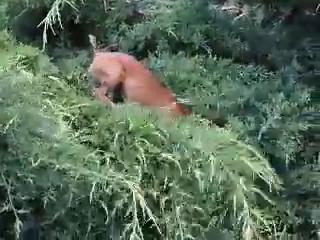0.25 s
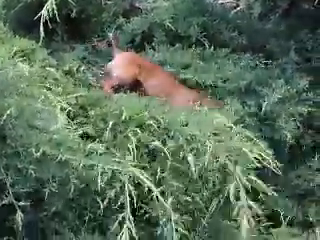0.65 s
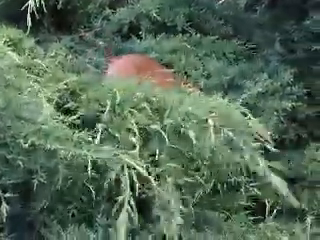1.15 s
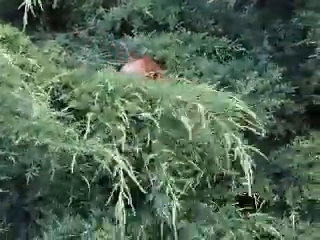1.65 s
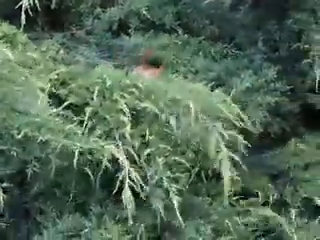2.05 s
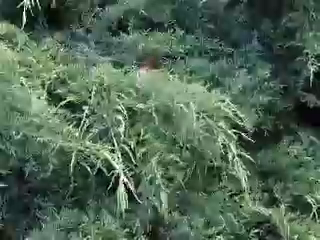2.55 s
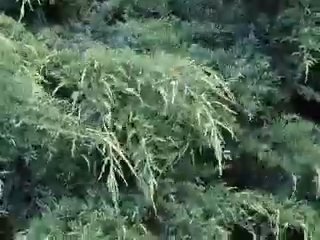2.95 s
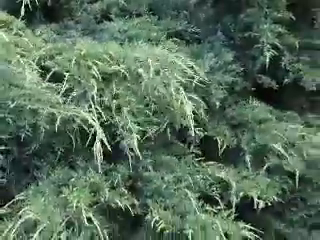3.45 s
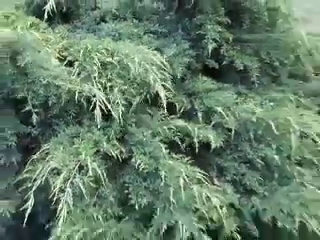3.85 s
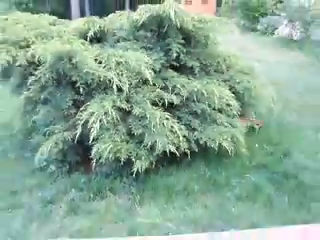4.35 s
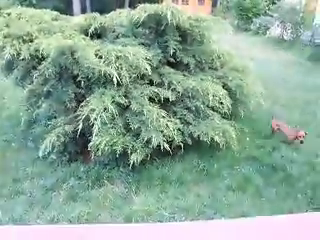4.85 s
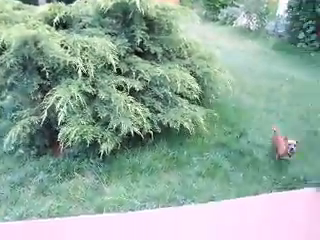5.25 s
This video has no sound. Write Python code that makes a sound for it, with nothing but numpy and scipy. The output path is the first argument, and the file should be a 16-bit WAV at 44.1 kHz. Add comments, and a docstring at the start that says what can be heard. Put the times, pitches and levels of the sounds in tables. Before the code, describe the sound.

Soft dry needle swishes and faint motor rattles open under bright bird phrases and one far, high yap. After a quieter middle, the bush shakes harder with loud snaps, while a volley of far deep barks echoes outdoors. A dull plastic knock follows, then light scuffing at the lawn edge. Mono, slightly dull camera microphone with low hiss and hum.

```python
"""Over a low hum, hiss and fading far rumble, a small dog pushes through a dense juniper: grains of noise swish.
Hoarse far birds warble, a near thrush sings (gliding sines) and a small dog yaps far off (pulses and breath).
A camera's lens motor buzzes and rattles, far birds whistle, twigs snap (noise bursts); then a big dog barks far off.
Late on, knocks ring the camera's case (damped modes) and paws scuff the lawn edge (gritty noise).
The garden echoes birds, dogs and twigs (noise tails)."""
import sys
import numpy as np
from scipy import signal
from scipy.io import wavfile
from scipy.ndimage import uniform_filter1d

SR = 44100
rng = np.random.default_rng(int(sys.argv[2]) if len(sys.argv) > 2 else 0)


def put_to_file(sound):
    """Save the sound as 16-bit audio at rate SR, in the file named by the first command-line argument."""
    columns = np.atleast_2d(sound).T  # one column per channel
    safe = np.clip(columns, -1, 1)
    whole_steps = np.round(safe * 32767)
    wavfile.write(sys.argv[1], SR, whole_steps.astype(np.int16))


N = 242986
TIME = np.arange(N) / SR   # s


def amp(db):
    """Amplitude ratio of a level in dB."""
    return np.exp(np.asarray(db) * np.log(10) / 20)


def unit(x):
    """Scale to rms 1."""
    return x / np.sqrt(np.mean(x ** 2) + 1e-20)


def columns(rows, start_s=0, fade_s=0.0023):
    """Columns over time, and a gate that is open only inside the table."""
    s, *values = np.transpose(rows)
    s = s + start_s
    gate = np.clip(np.minimum(TIME - s[0], s[-1] - TIME) / fade_s, 0, 1)
    return [np.interp(TIME, s, v) for v in values] + [gate]


def drift(rate_hz):
    """Random wander of spread 1: straight lines between random knots."""
    knots = rng.standard_normal(int(rate_hz * N / SR) + 2)
    return np.interp(TIME * rate_hz, np.arange(len(knots)), knots) * 1.22


def resonate(x, hz, width_hz):
    """Two-pole resonance with gain 1 on top."""
    r = np.exp(-np.pi * width_hz / SR)
    poles = [1, -2 * r * np.cos(2 * np.pi * hz / SR), r * r]
    return signal.lfilter(np.array([1, 0, -1]) * (1 - r * r) / 2, poles, x)


def colour(sources, spectrum, patchiness):
    """Third-octave bands of two sources dealt in turn, each band flickering; rms 1."""
    out, together, points = 0, drift(10), np.array(spectrum)
    edges_hz = 18 * 2 ** np.arange(0, 9.1, 1 / 3)
    for k, (low, high) in enumerate(zip(edges_hz, edges_hz[1:])):
        centre = np.log(low * high) / 2
        level_db = np.interp(centre, np.log(points[:, 0]), points[:, 1], left=-90)
        if level_db > -80:
            bandpass = signal.butter(2, [low, high], "band", fs=SR, output="sos")
            band = signal.sosfilt(bandpass, sources[k % 2])
            flicker_db = patchiness * (0.28 * together + drift(20))
            out = out + band * amp(level_db + flicker_db)
    return unit(out)


def grains(per_s, spread_db):
    """Two trains of tiny random contacts of uneven size, sharing their moments."""
    hits = rng.random(N) < per_s / SR
    sizes = amp(spread_db * np.minimum(rng.exponential(1, N), 5)) * hits
    envelope = uniform_filter1d(sizes, size=12) + 0.17 * np.mean(sizes)
    return envelope * rng.standard_normal((2, N))


def swells(rows):
    """Humps of gain that rise to a peak and fall at constant dB/s, added in power."""
    power = 0
    for peak_s, db, up_s, down_s in rows:   # up_s, down_s: time per 10 dB
        rise = (peak_s - TIME) / max(up_s, .005)
        fall = (TIME - peak_s) / max(down_s, .005)
        power = power + amp(db - 10 * np.maximum(rise, fall)) ** 2
    return np.sqrt(power)


def burst(s, t60_s, noise, rise_s):
    """Noise that swells from s and dies away."""
    after = np.clip(TIME - s, 0, 1)
    return noise * np.clip(after / rise_s, 0, 1) * amp(-60 * after / max(t60_s, .005))


def whistle(rows, start_s=0, gain_db=0, waver=.004, flutter_db=7.0, pace_hz=55):
    """A near sine that wavers in pitch (share) and level."""
    hz, level_db, gate = columns(rows, start_s, fade_s=0.0012)
    phase = 2 * np.pi * np.cumsum(hz * (1 + waver * drift(pace_hz))) / SR
    level_db = level_db + gain_db + flutter_db * drift(pace_hz)
    return np.sqrt(2) * gate * amp(level_db) * np.sin(phase)


def strokes(rows, **voice):
    """Each stroke glides evenly in pitch, swells over its first 3 % and holds."""
    share, shape_db = np.array([0, .03, 1]), np.array([-30, 0, 0])
    return sum(whistle(np.c_[s + share * length, first + share * (last - first), db + shape_db], **voice)
               for s, length, first, last, db in rows)


def bark(rows, throat, jitter, roughness, flutter, start_s=0, top_hz=1, gain_db=0):
    """Jittered pulses and gated breath through throat resonances; an open mouth lifts the upper ones."""
    pitch, level_db, mouth, gate = columns(rows, start_s)
    cycle = np.cumsum(top_hz * pitch * (1 + jitter * drift(150))) / SR % 1
    pulses = unit(np.exp(-9 * cycle) - 1 / 9)
    breath = rng.standard_normal(N) * (cycle < .5)
    breath_share = roughness * np.clip(.5 + .6 * mouth, 0, .85)   # a closing mouth sounds clearer
    source = (1 - breath_share) * pulses + breath_share * breath
    (low_hz, low_width_hz, _), *upper = throat
    low = resonate(resonate(source, low_hz, low_width_hz), low_hz, low_width_hz)
    high = sum(amp(db) * resonate(resonate(source, f, w), f, w) for f, w, db in upper)
    voice = low + 2 * np.clip(mouth, 0, 1) * high
    voice = voice / np.sqrt(uniform_filter1d(voice ** 2, size=2000) + 1e-9)   # even out before the envelope
    flutter_db = flutter * np.clip(2 * mouth, 0, 1) * np.clip(drift(130), -2, .5)
    return voice * gate * amp(level_db + gain_db + flutter_db)


def background():
    """Distant air and hiss, a far rumble dying at 16.5 dB/s, a wavering hum: coloured and resonated noise."""
    # distant air and hiss: f/Hz, density/dB per Hz (relative)
    air_spectrum = [(12, -29), (20, -0.5), (29, -8), (48, -3), (80, -20), (125, -14), (378, -16.5),
                    (577, -15), (1560, -18), (1820, -16), (2450, -15.5), (3560, -18), (7150, -20),
                    (7700, -10.5), (10000, -52), (16900, -120)]
    # hum: f/Hz, width/Hz, rms/dB
    hum_bands = [(53, 10, -61), (103, 8, -70)]
    air = amp(-45.5) * colour(rng.standard_normal((2, N)), air_spectrum, patchiness=1.77)
    rumble = amp(-55.5 - 16.5 * TIME) * unit(resonate(rng.standard_normal(N), 94, 12))
    hum = sum(amp(db) * unit(resonate(rng.standard_normal(N), hz, width)) for hz, width, db in hum_bands)
    return air + rumble + hum


def bush():
    """One train of small contacts shakes needles (fine, bright) and thicker branches (lower)."""
    # steady stirring: t/s, level/dB
    stirring = [(0, -58.5), (0.45, -43.5), (0.95, -45.5), (1.6, -44), (1.95, -50.5), (2.45, -75),
                (2.72, -52), (2.9, -51), (3.2, -46), (3.65, -41), (3.88, -52), (4.1, -36.5), (4.3, -39),
                (4.68, -39.5), (4.92, -51), (5.12, -41.5), (5.2, -64), (5.51, -42)]
    # shoves against a spray of needles: peak t/s, level/dB, swell/s per 10 dB, fade/s per 10 dB
    shoves = [(0.23, -45.5, 0.035, 0.069), (0.61, -34.5, 0.083, 0.065), (1.17, -41.5, 0.072, 0.05),
              (2.1, -42, 0.16, 0.36), (2.85, -40, 0.1, 0.064), (2.95, -41, 0.021, 0.037),
              (3.06, -33, 0.11, 0.24), (3.29, -28.5, 0.03, 0.062), (3.38, -30.5, 0.052, 0.034),
              (3.475, -33, 0.043, 0.09), (3.56, -37.5, 0.06, 0.095), (3.75, -33, 0.077, 0.077),
              (3.97, -36.5, .03, 0.23), (4.45, -38.5, 0.054, 1), (4.75, -29, 0.015, 0.079),
              (5.38, -41.5, 0.22, 0.026), (5.48, -34, 0.043, 0.013)]
    # needles, then branches: f/Hz, density/dB per Hz (relative)
    needle_spectrum = [(2500, -13), (3800, -36), (4800, -5), (6500, 1.5), (7800, -2), (9000, 5)]
    branch_spectrum = [(150, -13.5), (500, -8), (1000, -11.5), (1700, -6), (2600, -8.5), (4000, -11.5),
                       (6000, -18)]
    # branches in the mix: t/s, level/dB
    branch_share = [(0, -8), (3.5, -6), (4.1, -7), (5.51, -13.5)]
    stir_db, _ = columns(stirring)
    swish = np.hypot(amp(stir_db), swells(shoves))
    contacts = grains(5000, 1.6) * amp(1.4 * drift(45))
    needles = colour(contacts, needle_spectrum, patchiness=1.96)
    branches = colour(contacts, branch_spectrum, patchiness=1.5)
    branch_db, _ = columns(branch_share)
    return swish * (amp(-1.5) * needles + amp(branch_db) * branches)


def hoarse_warble():
    """Birds farther still: gliding sines, hoarse from fast pitch waver."""
    # strokes: t/s, length/s, first f/Hz, last f/Hz, level/dB
    warble = [(-.03, 0.16, 2240, 2210, -49), (.48, 0.2, 2595, 2593, -46.5),
              (1.41, 0.078, 3580, 3430, -48.5), (1.41, 0.059, 3150, 2985, -45),
              (1.47, 0.12, 2826, 2050, -47.5), (1.54, 0.063, 2086, 2000, -51.5),
              (1.82, 0.29, 1966, 2280, -55), (2.1, 0.11, 2286, 2384, -49), (2.24, .22, 2220, 2025, -53),
              (2.5, 0.1, 2090, 2215, -52), (2.62, 0.15, 2450, 2360, -53), (5.335, 0.057, 1783, 2020, -47.5)]
    return strokes(warble, waver=.022, flutter_db=3.5, pace_hz=140)


def thrush():
    """Three motifs of gliding sines, each sung from its template."""
    # motif strokes: t after start/s, length/s, first f/Hz, last f/Hz, relative level/dB
    zigzag = [(0, 0.023, 4630, 3500, -4.5), (.016, 0.019, 3560, 4300, -10), (.038, 0.02, 3400, 4100, -3.5),
              (.05, 0.0098, 4100, 5200, -7), (.057, 0.018, 3750, 2820, -1.5)]
    dip = [(0, 0.0142, 3700, 3270, -9.5), (.015, 0.0215, 3300, 3930, -12), (.048, .014, 2900, 3300, -15),
           (.06, 0.0153, 3270, 2880, -11)]
    flourish = [(.005, 0.022, 2960, 3360, -7), (.03, 0.016, 3620, 3320, -2.5),
                (.068, 0.0135, 3400, 3790, -5.5), (.086, 0.029, 3600, 4450, -6.5),
                (.105, 0.0189, 4170, 5210, 2), (.119, 0.01275, 5100, 5650, -7)]
    # when each motif is sung: t/s, level/dB
    zigzag_starts = [(0.046, -34.5), (0.199, -33), (.358, -34.5)]
    dip_starts = [(.526, -26), (0.688, -27.5), (.852, -27), (1.023, -27.5)]
    flourish_starts = [(1.191, -32)]
    songs = [(zigzag, zigzag_starts), (dip, dip_starts), (flourish, flourish_starts)]
    return sum(strokes(motif, start_s=s, gain_db=db, waver=0.008, flutter_db=1.5, pace_hz=200)
               for motif, starts in songs for s, db in starts)


def small_dog():
    """One high yap through a small throat."""
    # yap: t/s, pitch/Hz, level/dB, mouth opening/0-1
    yap = [(.18, 1070, -49, 0.2), (.234, 1062, -43, 0), (.241, 1027, -28.5, 0.24), (.26, 1019, -34, 0.2),
           (.31, 961, -33.5, 0.95), (.345, 926.4, -38, 0.6), (.385, 951, -38.5, 0.64),
           (.44, 912, -44.5, 0.47), (.52, 897, -60.5, 0.35)]
    # throat resonances: f/Hz, width/Hz, level/dB
    small_throat = [(1010, 340, 0), (810, 140, -6), (1350, 90, -3), (1900, 300, 0.5)]
    return bark(yap, small_throat, jitter=.03, roughness=0.8, flutter=6)


def lens():
    """Each motor step is a tonal buzz (an impulse into a resonance), then a gear rattle (a noise burst)."""
    # runs of steps: first t/s, last t/s, spacing/s, buzz level/dB, rattle level/dB
    runs = [(0.217, 0.416, .1, -47.5, -28), (0.551, 0.684, .033, -51.5, -39),
            (1.818, 1.848, .033, -49.5, -33.5), (1.878, 1.979, .1, -60, -33.5),
            (2.05, 2.215, .033, -50.5, -38.5), (2.278, 2.677, .1, -60, -30.5), (2.779, 2.878, .1, -58, -32),
            (4.353, 4.353, .1, -46, -32), (4.733, 4.733, .1, -45, -45), (4.889, 4.889, .1, -53, -41),
            (4.947, 5.047, .033, -50.5, -34.5), (5.28, 5.345, .066, -53, -32),
            (5.414, 5.452, .036, -51.5, -34)]
    buzz_hz, rattle_lag_s, step_spread_db = 615, 0.0105, 1.5
    noise, buzz, rattle = rng.standard_normal(N), np.zeros(N), np.zeros(N)
    for first, last, spacing, buzz_db, rattle_db in runs:
        for s in np.linspace(first, last, round((last - first) / spacing) + 1):
            buzz_off_db, rattle_off_db = step_spread_db * rng.standard_normal(2)
            buzz[round(s * SR)] = amp(buzz_db + buzz_off_db)
            step = burst(s + rattle_lag_s, 0.059, noise, rise_s=0.00087)
            rattle += amp(rattle_db + rattle_off_db) * step
    buzz = resonate(resonate(buzz, buzz_hz, 75), buzz_hz, 75) * amp(55.5)   # make up the filters' loss
    return buzz + 1.7 * resonate(rattle, 1920, 1020) + 0.53 * resonate(rattle, 3700, 4800)


def far_whistles():
    """Clear far birds: gliding sines with a slight waver."""
    # strokes: t/s, length/s, first f/Hz, last f/Hz, level/dB
    whistles = [(.47, 0.38, 1772, 1776, -47.5), (.68, 0.063, 2070, 2040, -54), (.74, 0.36, 1913, 1840, -52),
                (1.57, .15, 3960, 4020, -56), (2.68, 0.14, 1970, 1982, -57.5),
                (5.25, 0.33, 2764, 2424, -50)]
    return strokes(whistles, waver=0.006, flutter_db=3.3, pace_hz=50)


def snaps():
    """Each twig snap or scrape is a short broad noise crack coloured around its centre."""
    # snaps: t/s, level/dB, centre f/Hz
    twigs = [(0.5295, -24.5, 7200), (1.2427, -25.5, 4600), (1.815, -33, 2180), (2.0676, -37, 2620),
             (2.4793, -31, 5900), (2.733, -41, 2000), (2.9467, -21.5, 6800), (2.989, -25, 6140),
             (3.058, -14, 7070), (3.28, -15, 6640), (3.3752, -24, 2200), (3.464, -23.5, 6900),
             (3.7424, -17, 7300), (3.7455, -33, 6300), (3.75, -28, 6260), (3.7576, -33, 5300),
             (3.896, -27.5, 7360), (4.046, -24.5, 6500), (4.291, -29, 6860), (4.3337, -21.5, 6450),
             (4.732, -24, 6300), (5.119, -23.5, 1820), (5.117, -27, 4800), (5.3222, -27.5, 1720),
             (5.469, -31.5, 6000)]
    noise = rng.standard_normal(N)
    out = np.zeros(N)
    for s, level_db, hz in twigs:
        crack = burst(s - .001, .04, noise, rise_s=.001)
        crack = resonate(crack, hz, .5 * hz) + 0.044 * crack
        out += amp(level_db + 1.5) * crack / np.abs(crack).max()
    return out


def big_dog():
    """A volley of deep barks, one template varied in pitch, pitch swing, level and mouth opening."""
    # one bark: t after start/s, pitch/share of top, relative level/dB, mouth opening/0-1
    woof = [(0, .68, -9, 0.32), (.035, .85, -4.5, 1), (.07, 1, -1.5, 0.75), (.095, .8, -5.5, 0.83),
            (.15, .7, -9, .3), (.22, 0.66, -19, .1)]
    # volley: t/s, top pitch/Hz, pitch swing/0-1, level/dB, mouth scale/0-1
    woofs = [(3.51, 490, .3, -30.5, 0.8), (3.72, 588.6, 0.99, -30, 1), (3.914, 550, 0.99, -33, 0.85),
             (4.1, 460, .3, -39, 0.8), (4.17, 431.8, .3, -36, 0.2)]
    # throat resonances: f/Hz, width/Hz, level/dB (unused in the first row)
    big_throat = [(440, 300, 0), (283, 130, -9), (600, 225, -0.5), (883, 230, -14)]
    volley = 0
    for s, top_hz, swing, db, mouth in woofs:
        rows = np.power(woof, [1, swing, 1, 1]) * [1, 1, 1, mouth]
        volley = volley + bark(rows, big_throat, jitter=.06, roughness=.92, flutter=3.5,
                               start_s=s, top_hz=top_hz, gain_db=db)
    return volley


def knock():
    """A soft blow, a smooth push about as long as the contact, rings the modes of the plastic case."""
    # knock and its rebounds, then three light taps: t/s, level/dB, contact/ms
    blows = [(4.6064, -9.5, 0.46), (4.61, -12.5, 0.48), (4.613, -18.5, 0.57), (5.117, -33, 0.21),
             (5.277, -34.5, .3), (5.454, -35, 0.51)]
    # case modes: f/Hz, level/dB, t60/s
    case_modes = [(247, -22, 0.059), (457, -4.5, 0.03), (638, -4.5, 0.022), (763, -20.5, 0.085),
                  (1630, -1, 0.0035), (2530, -3.5, 0.006)]
    pushes = np.zeros(N) + 1e-18
    for s, level_db, contact_ms in blows:
        push = np.hanning(round(contact_ms * SR / 1000) + 3)
        pushes[round(s * SR):][:len(push)] = -amp(level_db) * push / push.sum()
    pushes = signal.sosfilt(signal.butter(2, 130, "high", fs=SR, output="sos"), pushes)
    out = 0
    for hz, level_db, t60_s in case_modes:
        r, w = amp(-60 / (t60_s * SR)), 2 * np.pi * hz / SR
        out = out + signal.lfilter([0, amp(level_db) * np.sin(w)], [1, -2 * r * np.cos(w), r * r], pushes)
    return out


def paws():
    """Paws scuff grass and paving: gritty grains in a mid band."""
    # scuffs: peak t/s, level/dB, swell/s per 10 dB, fade/s per 10 dB
    scuffs = [(5.04, -46, .07, 0.087), (5.325, -32.5, 0.02, 0.024)]
    grit = grains(9000, 2.8)[0]
    mid = resonate(resonate(grit, 1740, 550), 1670, 640)
    return swells(scuffs) * unit(mid + 0.21 * resonate(grit, 550, 500))


def garden(x, t60_s):
    """Scattered echoes from trees and walls: a dying noise tail of unit energy."""
    t = TIME[:SR]
    tail = rng.standard_normal(SR) * amp(-60 * t / t60_s) * np.clip(t / 0.001, 0, 1)
    return signal.fftconvolve(x, tail / np.linalg.norm(tail))[:N]


def scene():
    """Direct sounds plus garden echoes, the same in both channels."""
    hoarse, near, far = hoarse_warble(), thrush(), far_whistles()
    barks, twigs = small_dog() + big_dog(), snaps()
    direct = amp(-3.5) * near + far + amp(-4.5) * hoarse + amp(-0.5) * barks + twigs
    garden_t60_s, bark_t60_s = 0.87, 0.67   # low echoes die sooner
    # moving leaves smear the echoes: random gain on what feeds them
    bird_scatter, bark_scatter = drift(900), drift(110)
    echoes = garden(amp(-1.0) * far + amp(-3) * twigs, garden_t60_s)
    echoes += garden(amp(-2.0) * barks * bark_scatter, bark_t60_s)
    echoes += garden((amp(-2.0) * near + amp(-1.0) * hoarse) * bird_scatter, garden_t60_s)
    mono = direct + echoes + background() + bush() + lens() + knock() + paws()
    return np.array([mono, mono])


def record(dry):
    """One microphone sampled at a low rate: a faint mirror image sits above the edge; a small offset."""
    edge_hz, mirror_hz, cutoff_hz, offset = 7980, 16000, 11300, -0.0036
    band = signal.sosfilt(signal.ellip(12, .3, 80, edge_hz - 150, fs=SR, output="sos"), dry)
    image = amp(-32.5) * band * np.cos(2 * np.pi * mirror_hz * TIME)
    image = signal.sosfilt(signal.butter(8, edge_hz, "high", fs=SR, output="sos"), image)
    lowpass = signal.ellip(10, .5, 60, cutoff_hz, fs=SR, output="sos")
    return signal.sosfilt(lowpass, band + image) + offset


dry = scene()
out = record(dry)
put_to_file(out)
```